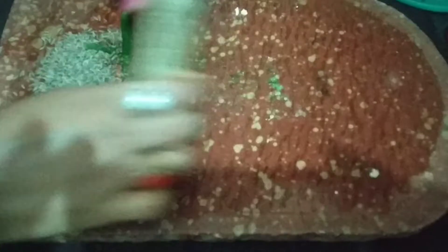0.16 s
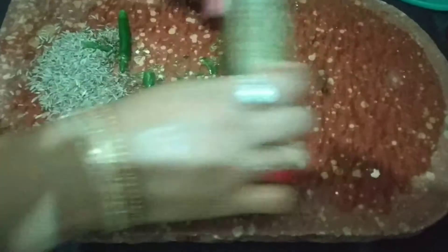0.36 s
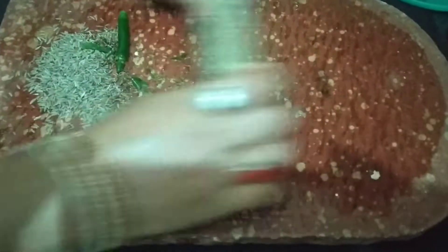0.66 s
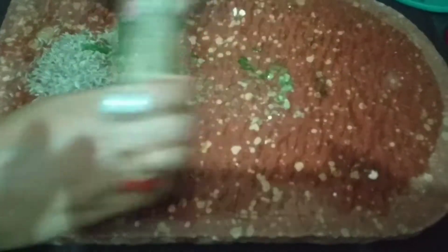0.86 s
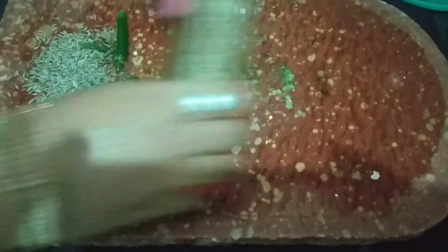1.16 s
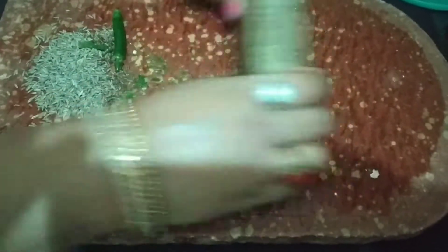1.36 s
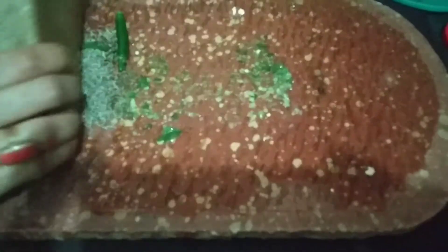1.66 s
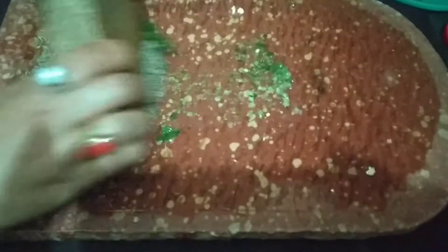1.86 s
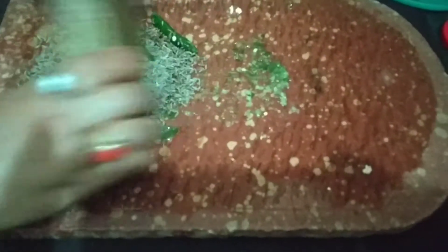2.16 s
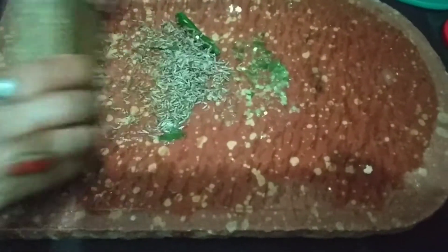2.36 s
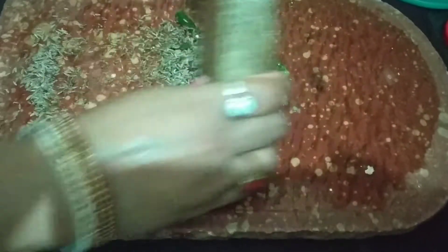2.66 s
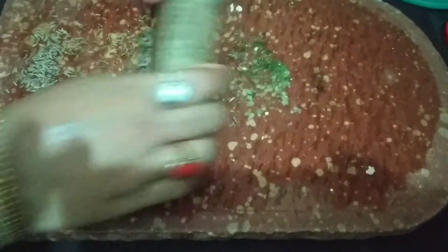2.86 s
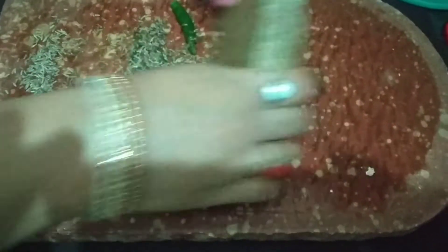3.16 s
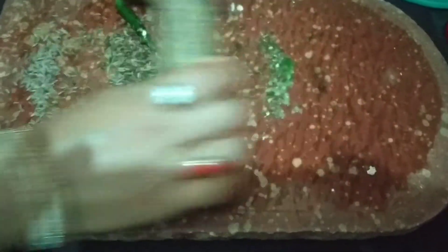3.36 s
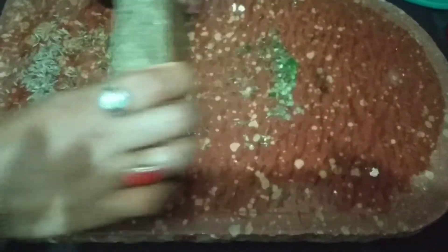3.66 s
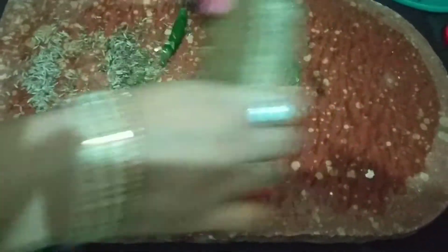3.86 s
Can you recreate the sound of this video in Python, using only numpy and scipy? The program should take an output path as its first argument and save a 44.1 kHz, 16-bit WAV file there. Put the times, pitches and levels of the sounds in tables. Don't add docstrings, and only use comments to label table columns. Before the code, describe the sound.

A heavy stone muller scrapes a stone slab, close, in a small kitchen. Bright gritty strokes of about 0.15 seconds run from the start, with hollow thuds; hard stone knocks cluster near 0.47 and 0.8. A short lift at 1.45 ends in a loud clack at 1.69. Grinding resumes, slackens around 2.6 under low handling rumble, then rasps and snaps seeds until 4, over faint hum.

```python
import sys
import numpy as np
from scipy import signal
from scipy.fft import rfft, irfft
from scipy.io import wavfile
from scipy.ndimage import uniform_filter1d

SR = 44100
rng = np.random.default_rng(int(sys.argv[2]) if len(sys.argv) > 2 else 0)


def gain_from_db(level_db):
    decades = np.asarray(level_db, float) / 20
    return 10 ** decades


def dump_mix(stems):
    frames = np.atleast_2d(stems).T
    limited = np.clip(frames, -1, 1)
    pcm = np.round(limited * 32767).astype(np.int16)
    wavfile.write(sys.argv[1], SR, pcm)


N = 176400

# f/Hz, level/dB
ROOM_TONE = [(24, -28), (40, 3.5), (479, -18.5), (1240, -24.5), (1370, -40), (2500, -42), (3560, -41),
             (3930, -41.5), (16000, -33)]
ROOM_TONE_DB = -54
# t/s, level/dB
HANDLING_LEVEL = [(0, -53), (.75, -53), (1.2, -51), (1.45, -56.5), (2.25, -63), (2.6, -39), (2.95, -59),
                  (3.3, -49), (4, -50)]
# f/Hz, level/dB
RUMBLE_COLOUR = [(10, -30), (21, -10), (28, 0), (35, -14), (45, -30), (100, -45)]
# f/Hz, t60/s
KITCHEN_DECAY = [(200, 0.28), (800, 0.31), (3000, 0.2), (10000, 0.21)]
KITCHEN_DB = -6.5
STAND_HZ, STAND_DB, STAND_SHAKE = 90.4, -47.5, 0.6

# start t/s, length/s, grit level/dB, muller ring level/dB,
# slab drag level/dB
STROKES = [
    (-.1, 0.15, -28.5, -45, -46.5),
    (0.061, 0.13, -30, -34, -34.5),
    (0.227, 0.17, -24, -43, -45.5),
    (0.412, 0.15, -31, -58, -39.5),
    (0.55, 0.2, -27.5, -45, -47),
    (0.742, 0.15, -29, -35.5, -43),
    (0.905, 0.16, -26.5, -43, -44),
    (1.067, 0.16, -27, -35.5, -34),
    (1.216, 0.18, -26.5, -44.5, -43.5),
    (1.382, 0.078, -40.5, -42.5, -44.5),
           (1.699, 0.09, -43, -39, -40), (1.758, 0.18, -26, -37.5, -45.5),
                  (1.951, 0.13, -27.5, -35.5, -47.5), (2.102, 0.15, -24.5, -32.5, -38),
                  (2.262, 0.13, -29, -35.5, -47), (2.391, 0.24, -30, -34, -40.5),
                  (2.576, 0.16, -41.5, -45, -46.5), (2.71, 0.1, -48, -56, -55.5),
                  (2.749, 0.14, -36, -50, -47.5), (2.912, 0.19, -25, -37, -46.5),
                  (3.103, 0.16, -25.5, -41.5, -46.5), (3.282, 0.17, -22.5, -40, -45.5),
                  (3.455, 0.18, -28.5, -43, -47.5), (3.626, .18, -23, -38.5, -43.5),
                  (3.779, 0.22, -29.5, -43, -47.5)]
FLOOR_LEAN = [-38, -43.5, -40, -46.5, -45, -46, -40.5, -46.5, -41, -53, -71, -43.5, -42.5, -40, -38, -46,
              -57, -56, -48, -42, -41, -39, -43, -39, -44.5]
GRIT_POWER, BUMP_POWER, THUMP_POWER, BUMP_SKEW = 1.54, 2.14, 0.98, 0.83

# f/Hz, level/dB, t60/s, right lag/rad
FLOOR = [(159, 0.5, 0.029, 0.15), (215, 2, 0.057, 0.039), (257.3, -2, 0.063, 0.033),
         (357, -5.5, 0.021, 0.34)]
# f/Hz, level/dB, t60/s, right lag/rad
SLAB_MODES = [(421, -7, 0.04, 0.23), (486.7, -7.5, 0.087, 0.13), (617.5, 4, 0.019, 0.39),
              (720.6, 3.5, 0.039, 0.35), (830, 10.5, 0.017, 0.46), (1012, 0.5, 0.017, 0.42)]
# f/Hz, level/dB, t60/s, right lag/rad
MULLER_MODES = [(1596, -6.5, 0.042, -2.87), (1642, -6.5, 0.052, -0.7), (1718, -8, 0.044, -0.4),
                (1997, 2, 0.01, 2.5), (2182, -3.5, 0.024, 1.13), (2652, -12, 0.053, 3.8),
                (2920, -1.5, 0.0072, 1.9), (4360, 1, 0.014, 1.12), (1233, -6.5, 0.0075, 1)]
# f/Hz, level/dB, t60/s, right lag/rad
CLACK_MODES = [(1594, 8.5, 0.019, -1.02), (1316, 3.5, 0.02, 1), (2180, -10, 0.0075, -0.43),
               (2826, -2.5, 0.012, -1.27), (4160, -14, 0.008, 0.42)]

# t/s, peak level/dB
SLAB_THUDS = [(0.08, -28), (0.142, -22.5), (0.604, -34), (0.661, -31.5), (0.773, -47), (0.814, -41),
              (0.961, -32), (1.256, -43), (1.289, -21.5), (1.683, -26), (2.113, -30), (2.155, -18),
              (2.33, -27.5), (2.435, -24.5), (2.467, -16.5), (2.794, -32), (2.951, -47), (2.99, -23.5),
              (3.334, -28), (3.488, -27), (3.664, -23.5), (3.772, -29)]
THUD_DB, THUD_S = -7, 0.0038
# t/s, muller peak level/dB, slab level re muller/dB, tick level re muller/dB
STONE_KNOCKS = [(0.087, -30, 6.5, 0), (0.4445, -25.5, -3, -12), (0.4732, -10, -6.5, -13),
                (0.4781, -14, -12, -9), (0.4891, -10.5, -5, -31), (0.5672, -16, -16, -5),
                (0.7886, -18.5, -3, -3), (0.7988, -29.5, 6, -20), (0.8145, -29, 5.5, -22),
                (0.8195, -20, -8, -16), (0.829, -27.5, 5.5, -20), (0.915, -34, -17, -20),
                (0.941, -31.5, 3, -8), (1.2922, -14.5, -2, -29), (1.3605, -21.5, -2, -11),
                (1.6872, -7, -7.5, -21), (1.697, -27.5, -1, -20), (1.712, -30, 1, -18),
                (1.724, -27, 1, -20), (1.8603, -25.5, -25, 3), (2.1206, -28.5, -10, 4),
                (2.5126, -24, 4.5, -13), (2.793, -26, -5.5, 1), (2.9489, -23.5, -33, 4.5),
                (3.3343, -26, -14, -17), (3.8601, -28, -1.5, -6)]
KNOCK_DB, RING_DB, KNOCK_THUMP_DB, CONTACT_HZ = 0.5, -8.5, -24.5, 6000
TICK_DB, TICK_S = 2.5, 0.0018
RATTLE_DB, RATTLE_S = -17, 0.012

BUMPS_PER_S, BUMP_SPREAD_DB, BUMP_FLICKER_DB, THUMP_FLICKER_DB = 700, 2, 0.5, 0
# t/s, peak level/dB, t60/s
SEED_SNAPS = [(0.2262, -34, 0.048), (0.2673, -26, 0.025), (0.4298, -33, 0.04), (0.601, -32, 0.054),
              (0.943, -30, .04), (1.5893, -51, 0.036), (1.6853, -32, 0.052), (1.7464, -31, 0.022),
              (1.7729, -32, .05), (1.7963, -33, .015), (2.3106, -21, .02), (2.4295, -24.5, 0.028),
              (2.4478, -26, 0.088), (2.474, -17, 0.032), (2.7167, -25, 0.052), (2.7626, -38, 0.016),
              (2.784, -61, 0.026), (2.925, -41, 0.046), (2.9823, -24, 0.033), (3.0076, -16.5, 0.062),
              (3.125, -26, 0.036), (3.173, -25, 0.032), (3.3113, -40, 0.043), (3.3204, -32, 0.033),
              (3.388, -22, 0.022), (3.647, -31, 0.06), (3.72, -17.5, 0.054), (3.8534, -21.5, 0.041)]
SNAP_RISE_S = 0.0012
# f/Hz, level/dB
GRIT_COLOUR = [(1530, -24), (2600, -23), (3920, -11.5), (5780, -9.5), (6990, -6), (9840, 1), (12800, -9),
               (15000, -6.5), (16000, -23)]
GRIT_PER_S, GRIT_SPREAD_DB, GRIT_FLICKER_DB = 10000, 2.2, 1.5
PATCH_DB, BRIGHTEN = 4, 0.2

# f/Hz, level/dB
RIGHT_COLOUR = [(100, .1), (600, .8), (1500, -.7), (5000, 1.6), (8000, -.8), (13000, -1.9)]
EDGE_HZ = 16050


def evened(x):
    return x / np.sqrt(np.mean(x ** 2) + 1e-20)


def read(points, hz):
    f, value = np.transpose(points)
    return np.interp(np.log(hz + 1), np.log(f + 1), value)


def coloured(x, points):
    return irfft(rfft(x) * gain_from_db(read(points, np.fft.rfftfreq(N, 1 / SR))), N)


def flicker(seconds):
    size = max(round(seconds * SR), 2)
    once = uniform_filter1d(rng.standard_normal(N), size)
    return evened(uniform_filter1d(once, size))


def grains(per_s, spread_db):
    size = gain_from_db(spread_db * np.minimum(rng.exponential(1, N), 4.5))
    return evened(size * (rng.random(N) < per_s / SR))


def body(modes, cut_hz):
    t = np.arange(8000) / SR
    ring = 0
    for hz, db, t60, lag in modes:
        lags = np.array([[0], [lag]])
        ring = ring + gain_from_db(db - 60 * t / t60) * np.sin(2 * np.pi * hz * t - lags)
    ring = ring * np.minimum(t * cut_hz * 3, 1)
    ring = signal.sosfilt(signal.butter(3, cut_hz, "high", fs=SR, output="sos"), ring)
    return ring / abs(ring).max()


def strike(x, ring):
    return signal.oaconvolve(x[None] * np.ones((2, 1)), ring, axes=1)[:, :N]


def pressure(column, power, skew=1):
    total_power = np.zeros(N)
    for row, lean_db in zip(STROKES, FLOOR_LEAN):
        start, length = row[:2]
        at = np.arange(max(round(start * SR), 0), min(round((start + length) * SR), N))
        u = np.clip((at / SR - start) / length, 0, 1)
        arch = abs(np.sin(np.pi * u ** skew)) ** power
        total_power[at] += (gain_from_db([*row, lean_db][column]) * arch) ** 2
    return np.sqrt(total_power)


def patchy(x, speed, patch_db, brighten):
    hz, t, z = signal.stft(x, SR, nperseg=256)
    spots = uniform_filter1d(rng.standard_normal(z.shape), size=2, axis=1)
    spots = evened(uniform_filter1d(spots, size=9, axis=2))
    speed_then = np.interp(t, np.arange(N) / SR, speed)
    speed_db = np.clip(20 * np.log10(speed_then + 1e-9) + 28, -18, 6)
    tilt = brighten * speed_db * np.log2(np.maximum(hz, 2000) / 8000)[:, None]
    return signal.istft(z * gain_from_db(patch_db * spots + tilt), SR, nperseg=256)[1][:, :N]


def hush():
    a, b, c, d = rng.standard_normal((4, N))
    side = coloured(b - a, [(300, -91), (1400, 18), (16000, 7)])
    air = evened(coloured(np.array([a, a + side]), [(5, -64)] + ROOM_TONE + [(17000, -65)]))
    s, db = np.transpose(HANDLING_LEVEL)
    shake = evened(coloured(np.array([c + 0.19 * d, c - 0.14 * d]), RUMBLE_COLOUR))
    return gain_from_db(ROOM_TONE_DB) * air + gain_from_db(np.interp(np.arange(N) / SR, s, db)) * shake


def kitchen(x):
    taps = np.zeros((2, SR // 2))
    at = np.arange(200, SR // 2 - 20, 20) + rng.integers(0, 20, (2, (SR // 2 - 201) // 20))
    np.put_along_axis(taps, at, rng.choice([-1., 1.], at.shape), 1)
    hz, t, z = signal.stft(taps, SR, nperseg=256)
    z[1, :3] = z[0, :3]
    decay = gain_from_db(-60 * t / read(KITCHEN_DECAY, hz)[:, None])
    tail = signal.istft(z * decay, SR, nperseg=256)[1]
    return signal.fftconvolve(x, tail / np.linalg.norm(tail[0]), axes=1)[:, :N]


def stand():
    shape = [(STAND_HZ * k, db) for k, db in [(.6, -35), (.9, -6), (1, 0), (1.12, -6), (1.6, -35)]]
    shake = uniform_filter1d(pressure(column=5, power=THUMP_POWER), 3000)
    hum = evened(coloured(rng.standard_normal(N), shape))
    sides = np.array([hum, hum + 0.06 * np.roll(hum, shift=3000)])
    return gain_from_db(STAND_DB) * sides * (evened(abs(shake)) + 0.069) ** STAND_SHAKE


def thuds(floor_ring):
    push, soft = np.zeros(N), np.hanning(round(THUD_S * SR))
    for s, db in SLAB_THUDS:
        push[round(s * SR)] = gain_from_db(db + THUD_DB)
    return strike(np.convolve(push, soft / soft.sum() * 2)[:N], floor_ring)


def knocks(muller_ring, slab_ring, floor_ring):
    muller, slab, tick = np.zeros((3, N))
    t = np.arange(2000) / SR
    chance = rng.standard_normal((len(STONE_KNOCKS), 2000))
    for (s, db, slab_db, tick_db), z in zip(STONE_KNOCKS, chance):
        blow = gain_from_db(RATTLE_DB - 11.0 * t / RATTLE_S) * z * (abs(z) > 2.3) / 2
        blow[0] = -1
        at = slice(round(s * SR), round(s * SR) + 2000)
        muller[at] += gain_from_db(db) * blow
        slab[at] += gain_from_db(db + slab_db) * blow
        tick[at] += gain_from_db(db + tick_db + TICK_DB - 4.6 * t / TICK_S)
    band = signal.butter(1, [3000, 12000], "band", fs=SR)
    bright = signal.lfilter(*band, tick * rng.standard_normal((2, N)))
    rings = strike(muller, gain_from_db(RING_DB) * muller_ring)
    rings = rings + strike(muller, body(CLACK_MODES, cut_hz=1660)) + strike(slab, slab_ring)
    rings = signal.lfilter(*signal.butter(2, CONTACT_HZ, fs=SR), rings)
    return gain_from_db(KNOCK_DB) * rings + gain_from_db(KNOCK_THUMP_DB) * strike(muller, floor_ring) + bright


def bumps(ring, column, power, per_s, flicker_db, skew=1):
    hits = grains(per_s, BUMP_SPREAD_DB) * rng.standard_normal(N) * gain_from_db(flicker_db * flicker(0.0012))
    return strike(evened(hits) * pressure(column, power, skew), ring / np.linalg.norm(ring[0]))


def grit():
    unsteady = gain_from_db(GRIT_FLICKER_DB * flicker(0.013) + 0.53 * flicker(0.031))
    size = grains(GRIT_PER_S, GRIT_SPREAD_DB) * unsteady
    speed = pressure(column=2, power=GRIT_POWER, skew=1.0)
    drive = evened(size) * speed
    t = np.arange(1200) / SR
    for s, db, t60 in SEED_SNAPS:
        snap = gain_from_db(db + 1.5 - 60 * t / t60) * np.minimum(t / SNAP_RISE_S, 1)
        part = drive[round(s * SR):][:1200]
        part += snap[:len(part)]
    z = rng.standard_normal((2, N))
    paths = np.array([z[0], 0.3 * np.roll(z[0], shift=5) + z[1]])
    rasp = coloured(drive * paths / paths.std(axis=1)[:, None], [(20, -53), (1500, -23.5)] + GRIT_COLOUR)
    rasp = patchy(rasp, speed, PATCH_DB, BRIGHTEN)
    return rasp * np.sqrt(np.mean(drive ** 2) / np.mean(rasp ** 2))


def scene():
    muller, slab = body(MULLER_MODES, cut_hz=1480), body(SLAB_MODES, cut_hz=371)
    floor = body(FLOOR, cut_hz=126)
    stroke = dict(power=BUMP_POWER, per_s=BUMPS_PER_S, flicker_db=BUMP_FLICKER_DB, skew=BUMP_SKEW)
    stones = bumps(muller, column=3, **stroke) + bumps(slab, column=4, **stroke)
    stones = patchy(stones, np.ones(N), patch_db=3.5, brighten=0)
    thumps = bumps(floor, column=5, power=THUMP_POWER, per_s=3200, flicker_db=THUMP_FLICKER_DB)
    near = thuds(floor) + knocks(muller, slab, floor) + thumps + stones + grit()
    return hush() + gain_from_db(KITCHEN_DB) * kitchen(near) + stand() + near


def roll_off(x):
    return signal.sosfilt(signal.butter(12, 16100, fs=SR, output="sos"), x)


def record(dry):
    ports = np.array([dry[0], coloured(dry[1], RIGHT_COLOUR)])
    edge = signal.firwin(511, EDGE_HZ, window=("kaiser", 9), fs=SR)
    mix = signal.oaconvolve(ports, edge[None], "same", axes=1)
    return roll_off(mix)


dry = scene()
out = record(dry)
dump_mix(out)
```